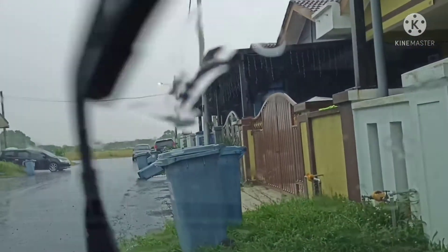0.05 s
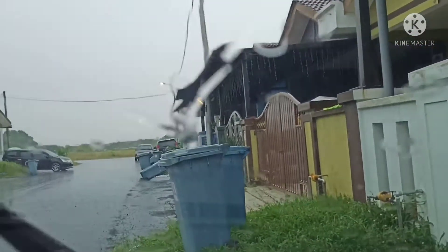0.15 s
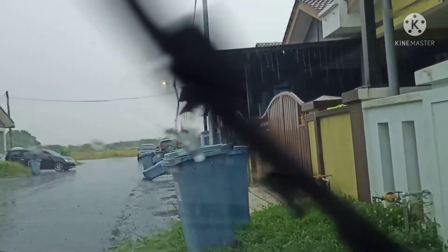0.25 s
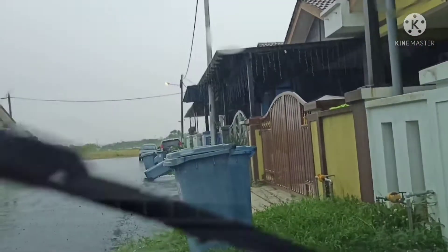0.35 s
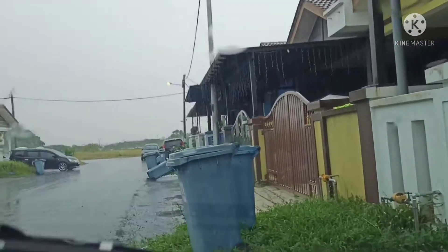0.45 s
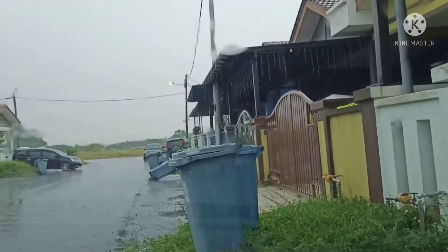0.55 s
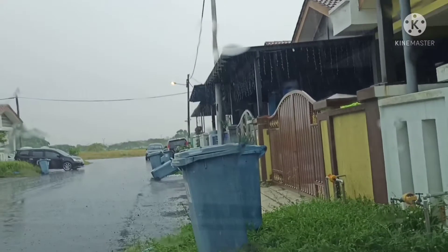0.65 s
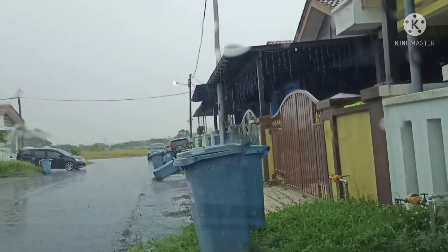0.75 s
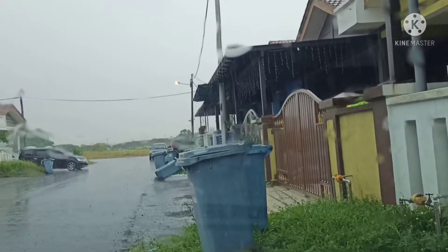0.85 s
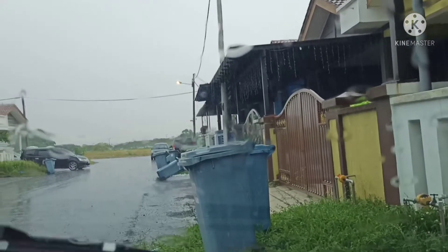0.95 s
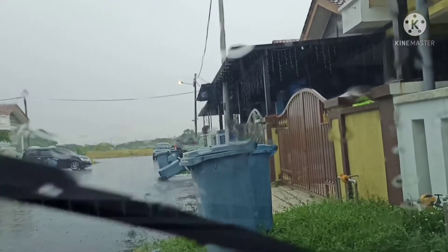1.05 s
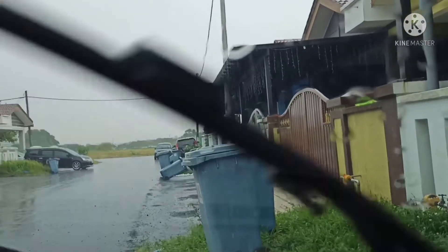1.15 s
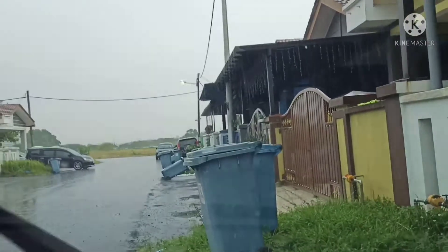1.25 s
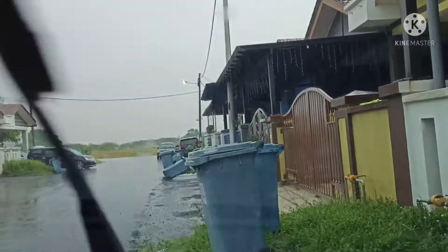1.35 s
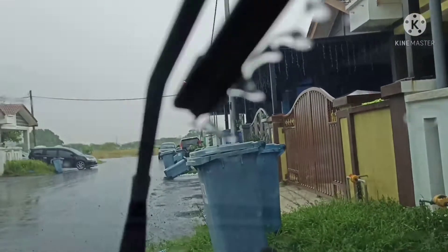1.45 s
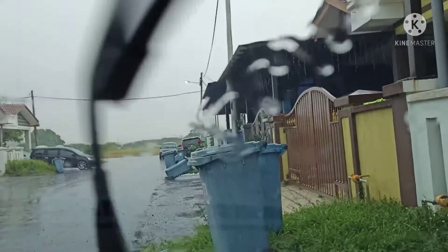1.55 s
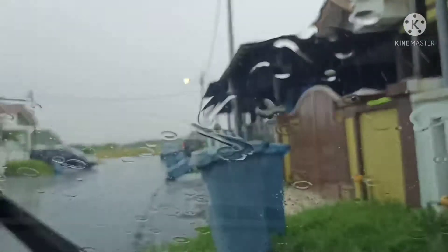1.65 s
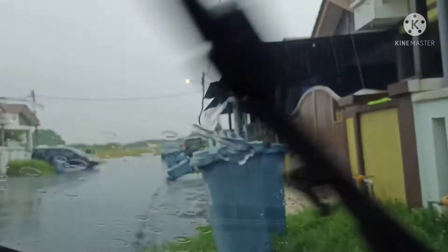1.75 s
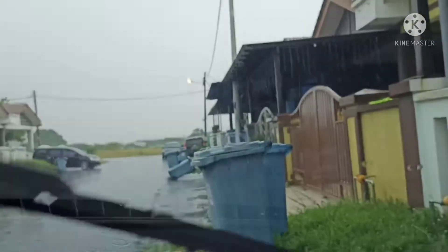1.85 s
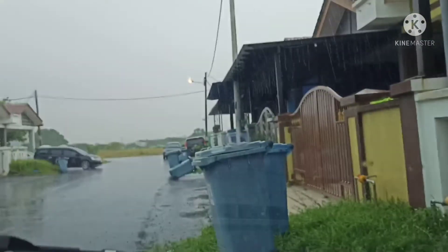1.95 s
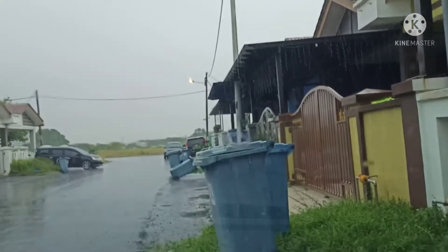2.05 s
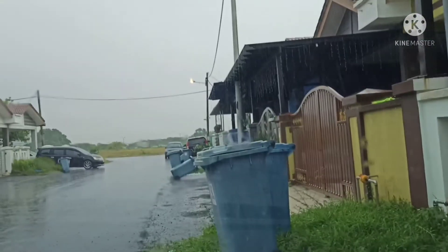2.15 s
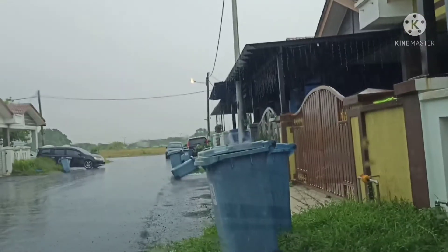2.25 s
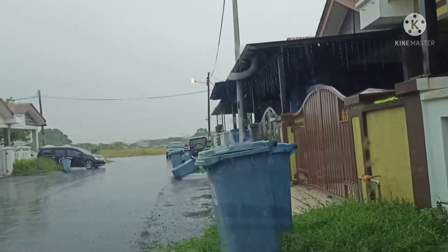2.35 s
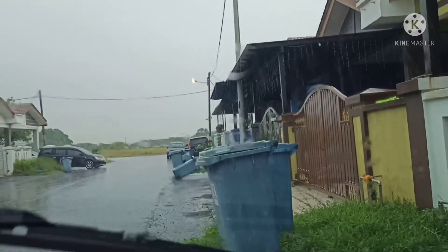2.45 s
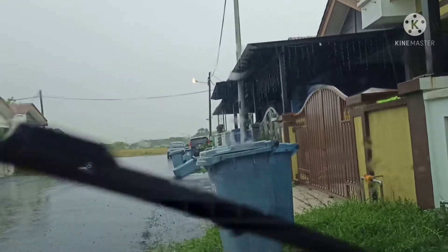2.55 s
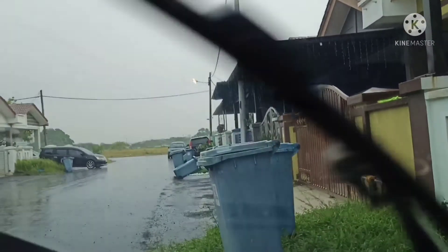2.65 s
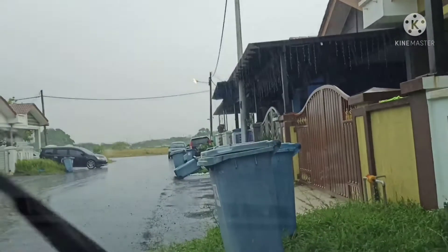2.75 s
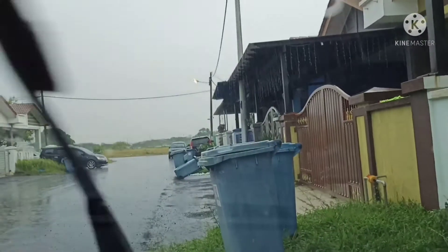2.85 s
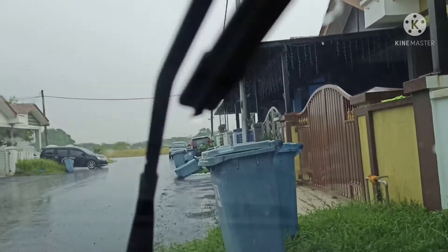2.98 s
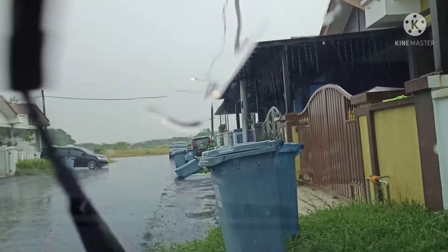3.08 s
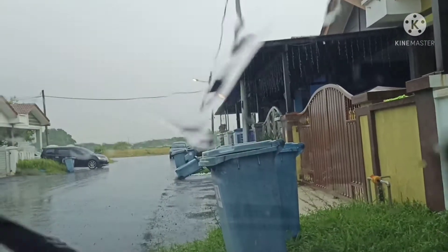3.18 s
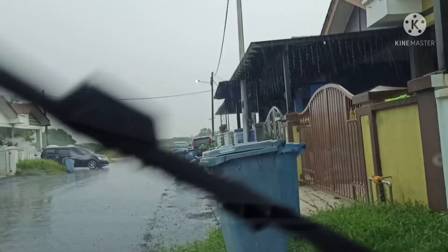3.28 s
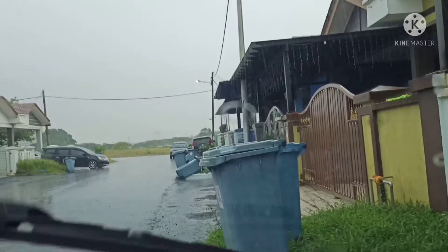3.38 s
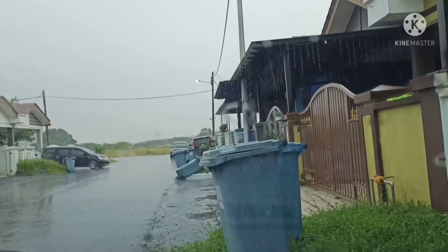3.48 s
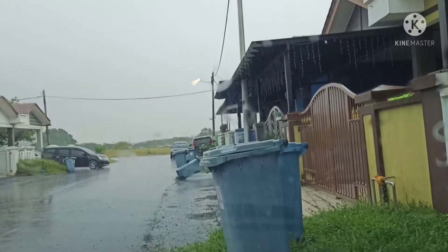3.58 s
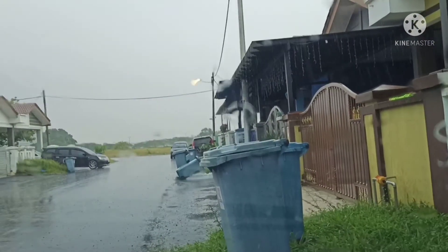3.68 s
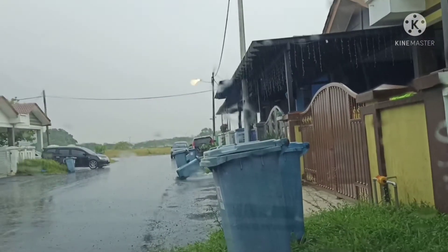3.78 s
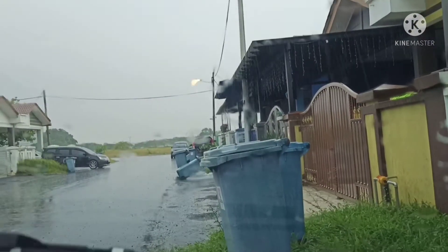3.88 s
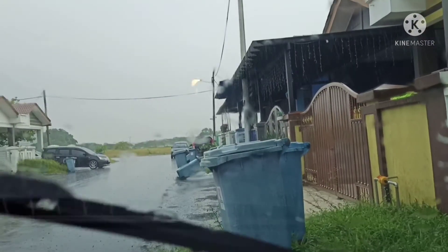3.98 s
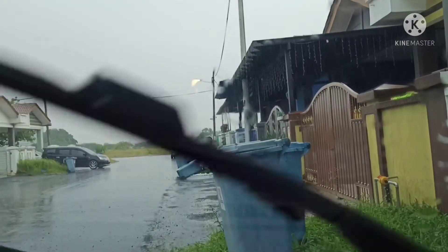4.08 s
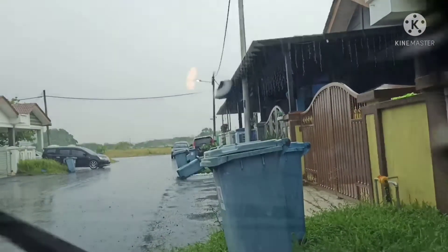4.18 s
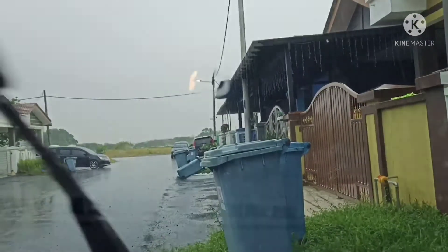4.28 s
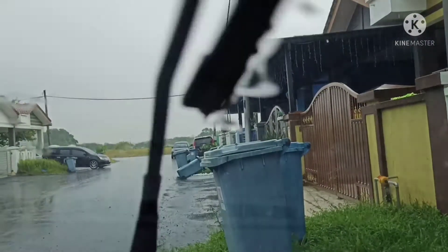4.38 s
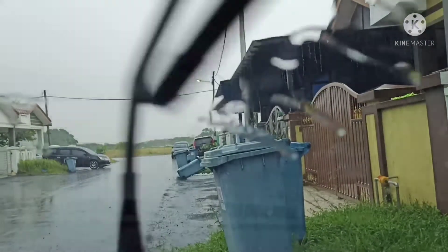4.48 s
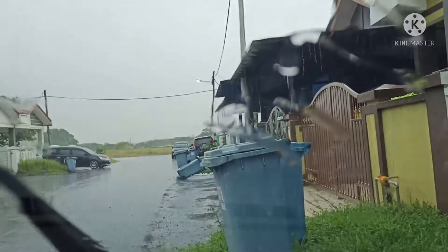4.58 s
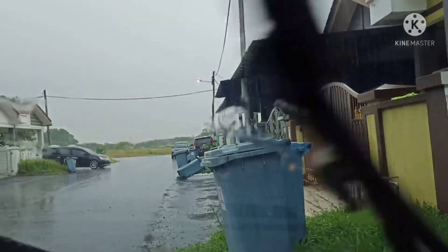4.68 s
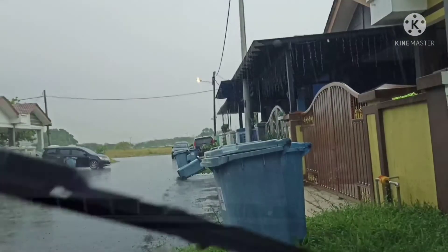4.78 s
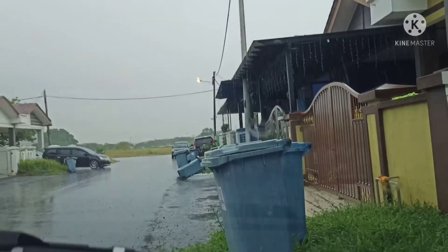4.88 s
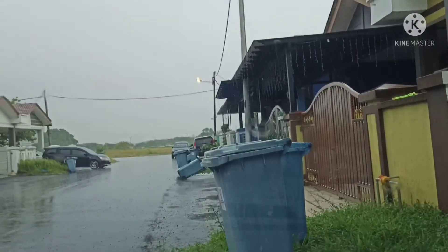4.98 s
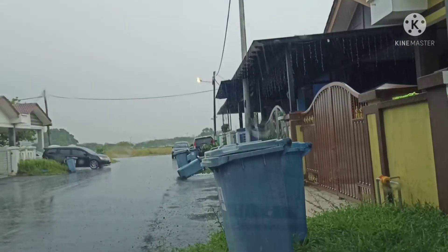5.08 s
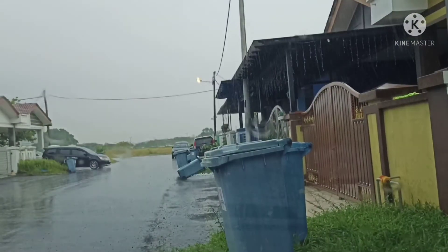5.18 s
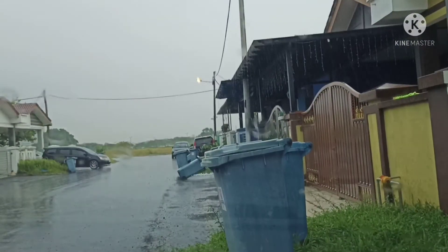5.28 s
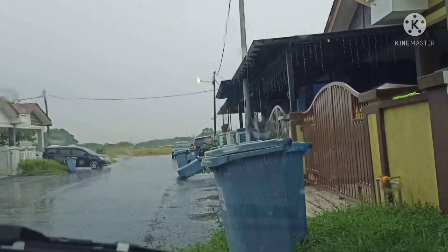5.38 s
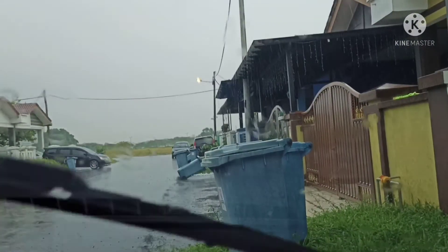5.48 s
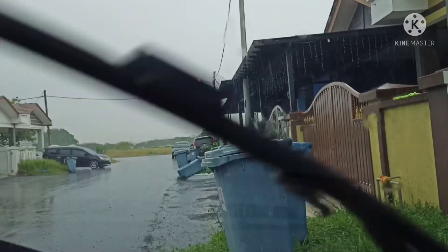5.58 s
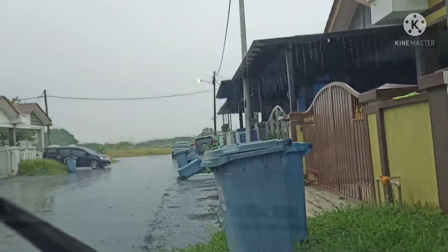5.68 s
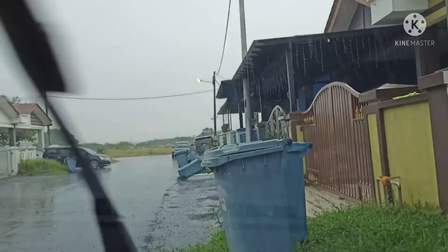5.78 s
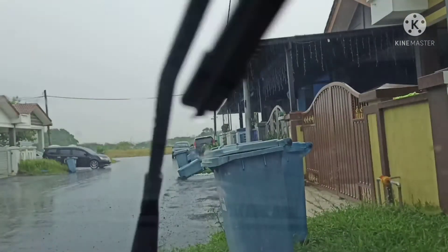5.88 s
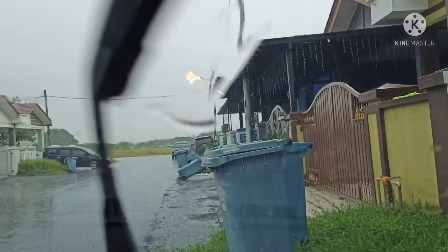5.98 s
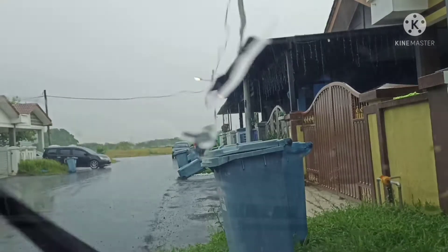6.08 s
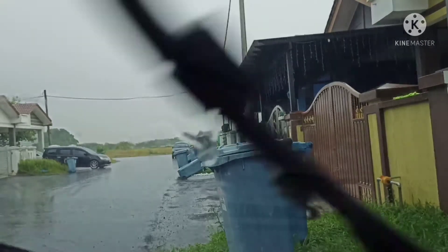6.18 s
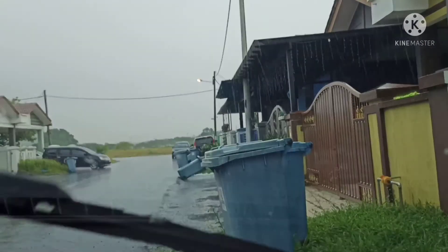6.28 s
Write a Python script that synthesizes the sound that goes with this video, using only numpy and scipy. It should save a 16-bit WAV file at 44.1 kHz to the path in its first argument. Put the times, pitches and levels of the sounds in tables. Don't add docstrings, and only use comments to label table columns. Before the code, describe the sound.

Steady rain drums on a car heard from the cabin, with rhythmic low wiper thuds, rubbery stuttering drags and sharp little droplet taps.

```python
import sys
import numpy as np
from scipy import signal
from scipy.io import wavfile
from scipy.ndimage import uniform_filter1d

SR = 44100
rng = np.random.default_rng(int(sys.argv[2]) if len(sys.argv) > 2 else 0)


def invert_db(x):
    u = np.asarray(x, float) / 20
    return 10 ** u


def wav_out(sig):
    wavfile.write(sys.argv[1], SR, np.round(np.clip(np.atleast_2d(sig).T, -1, 1) * 32767).astype(np.int16))


N = 279153
TIME_S = np.arange(N) / SR

# (time [s], level [dB])
RUMBLE_LEVEL = [(0.0, -35), (0.95, -50), (1.76, -42), (2.0, -50), (2.3, -43), (3.21, -43), (3.9, -57),
                (4.78, -42), (5.01, -52), (6.33, -48)]
# (time [s], level [dB])
RAIN_LEVEL = [(0.0, -45), (0.62, -44.5), (1.5, -46), (3.0, -46), (3.4, -46.5), (3.9, -46), (5.7, -46.2),
              (6.33, -48.5)]
# (frequency [Hz], density [dB per Hz])
GLASS_SPECTRUM = [(470, -20.5), (800, -20.5), (952, 1.5), (1080, -1), (1980, -6), (2380, -8.5), (3250, -6),
                  (3590, -6), (3910, -5), (6590, -14), (7930, -9), (9680, -19), (12600, -25.5),
                  (15500, -18.5)]
# (frequency [Hz], density [dB per Hz])
PANEL_SPECTRUM = [(35, -25), (60, -10.5), (75, -18.5), (86, -9.5), (107, 0), (152, -12.5), (193, -1),
                  (226, -10.5), (300, -6), (376, -12), (407, -16), (592, -12), (900, -20), (1170, -32.5),
                  (1980, -120)]
# (frequency [Hz], density [dB per Hz])
CLOTH_SPECTRUM = [(3530, -37), (6000, -12.5), (7380, -12), (8080, -1), (8780, -8), (9550, -8), (10200, -13),
                  (11200, -8), (13000, -11.5), (14900, -3.5), (15500, -6.5)]
# (start [s], length [s], level at end of press [dB], duller part [dB])
CLOTH_STROKES = [(0.0, 0.17, -50.5, 4), (.36, 0.46, -50.5, 6), (0.981, 0.088, -51, 0), (1.095, .27, -37, 3),
                 (1.8, 0.15, -52, 2), (2.0, 0.14, -55, 3), (2.176, 0.02, -45, 3), (2.22, 0.21, -53.5, 0),
                 (2.617, 0.036, -57.5, -4), (2.72, .24, -44, -2), (3.07, .045, -44.5, 1),
                 (3.163, 0.018, -59, 3)]
# (time [s], level [dB], rib rate [1/s])
SCUFF_PATHS = [
    [(1.892, -64, 760), (1.903, -30.5, 770), (1.915, -33.5, 640), (1.927, -29, 605), (1.945, -35.5, 500),
     (1.962, -35.5, 430), (1.978, -51, 295)],
    [(2.158, -46, 940), (2.166, -32.5, 980), (2.176, -33, 1260), (2.186, -30.5, 1620), (2.192, -32, 1900),
     (2.200, -36, 2000), (2.210, -56, 2080)],
]
# (frequency [Hz], density [dB per Hz])
SCUFF_SPECTRUM = [(240, -34), (653, 3.5), (973, -8), (1470, 0), (2260, -15), (3700, -4.5), (4300, -8),
                  (4900, -3), (6000, -12.5), (7250, -1.5), (9500, -14), (15600, -26)]
# (time [s], peak [dB], low part [dB], high part [dB])
CLEAR_DROPS = [(0.0727, -25, -22, -21), (0.4249, -15, -6.5, -40), (0.5132, -19, -15, -23),
               (0.5664, -17, 1.5, -19), (1.0978, -16, 1.5, -16), (1.4253, -22, 6.5, -26),
               (1.747, -24, -10, -15), (2.0348, -25, -15, -9), (2.4498, -19, 5, -14.5),
               (2.4763, -22, -2, -19), (2.9723, -18, -5, -23.5), (3.3262, -20, 2.5, -24),
               (3.4147, -16, -1, -25), (3.4421, -20, 1, -16), (3.7043, -22.5, 3, -19),
               (3.8311, -19, 1, -18), (3.8822, -18.5, 0, -29), (4.0184, -22, 7.5, -15),
               (4.2015, -19, -15, -26), (4.25, -18.5, -15, -10.5), (4.314, -19, -3, -25),
               (4.3882, -28, 14, -24), (4.784, -23, -5, -23), (4.9901, -20.5, 2.5, -18),
               (5.4001, -19.5, 0, -15), (5.4584, -19, -11, -16), (5.5948, -17.5, -7, -31),
               (5.875, -20, -18, -14), (6.0496, -19, -6, -18), (6.1756, -21, -21, -21)]
# (time [s], level [dB], brightness [dB per decade])
ARM_KNOCKS = [
    (0.9848, -11, 0.5),
    (2.4754, -14.5, -12),
    (3.948, -12, 1),
    (5.4196, -17.5, 0.5),
]
# (frequency [Hz], level [dB], t60 [s])
ARM_MODES = [(291, 2, 0.041), (392, -17.5, 0.095), (1084, -6, 0.012), (3090, -7.5, 0.013),
             (4420, -12.5, 0.018)]
# (time [s], cabin boom [dB], glass [dB], slap [dB], slap lag [s])
BLADE_FLIPS = [
    (.186, -5.5, -16.5, -21, .009),
    (1.677, -17, -13.5, -18, 0.0043),
    (3.157, -5.5, -15.5, -19.5, .010),
    (4.636, -14.5, -15.5, -20, .0041),
    (6.099, -11, -14.5, -24.5, .0058),
]
# (frequency [Hz], rise [s], t60 [s])
FLIP_MODES = [
    (99.7, 0.026, 0.14),
    (171, 0.0088, 0.155),
    (280.6, 0.008, .11),
    (141.3, 0.0087, 0.086),
]
# (frequency [Hz], level [dB], t60 [s])
LIP_MODES = [(392, 5.5, 0.065), (528, -7.5, 0.12), (643, -1, 0.077), (802, 1, 0.04), (1142, -3, 0.035),
             (1340, -11.5, 0.051)]
# (frequency [Hz], density [dB per Hz])
SPRAY_SPECTRUM = [(940, -50), (1600, -9), (3260, -22), (4960, 10), (5500, -10), (7750, 10), (12000, -24),
                  (15500, -8)]
# (level before [dB], resonance before [Hz], level after [dB], resonance after [Hz])
FLIP_DRAG = [
    (-28, 225, -21, 170),
    (-23.5, 177, -23, 130),
    (-28, 130, -21, 175),
    (-28, 120, -22, 130),
    (-28, 125, -26, 100),
]
# (peak time [s], drag [dB], loudest body resonance [Hz], time to lose 10 dB [s])
DOWN_BOUTS = [(.36, -33, 170, .03), (.47, -35, 110, .07), (.6, -33, 104, 0.05), (.71, -32, 150.3, 0),
              (.765, -32, 105, .035), (.91, -29, 130, 0.04), (.964, -26, 110, 0.05),
              (1.925, -28, 125, 0.05), (1.99, -30, 105, .04), (2.04, -30, 190, .04), (2.21, -29, 110, 0.1),
              (2.37, -28, 130.3, .04), (2.43, -25, 150, 0.02), (3.34, -33, 185, 0.08),
              (3.52, -34, 105, 0.12), (3.84, -33, 115, 0.04), (3.893, -22.5, 140, .03),
              (4.99, -36, 106.6, 0.07), (5.15, -33, 115, .04), (5.245, -32, 124.9, 0.05),
              (5.36, -25, 115, 0.06), (6.32, -29, 98, .05)]
# (peak time [s], drag [dB], loudest body resonance [Hz], time to lose 10 dB [s])
UP_BOUTS = [(.045, -34, 237.6, 0), (.108, -37, 231.6, .02), (1.02, -23, 105, 0.05),
            (1.097, -17, 190, 0.0468), (1.164, -15, 159.8, 0.04), (1.235, -20, 164.8, .05),
            (1.44, -29, 137, .06), (1.614, -26, 139.8, 0.06), (2.475, -18, 124.9, .045),
            (2.54, -28, 132.9, 0), (2.7, -32, 130, 0.1), (2.91, -24.5, 119.9, .07), (3.975, -26, 115, .03),
            (4.03, -11, 184, 0.0446), (4.105, -25, 160, 0.02), (4.158, -18.5, 166.1, 0.04),
            (4.24, -29.5, 175, .03), (4.3, -21, 186.2, 0.04), (4.43, -30, 135, 0.09),
            (4.578, -22.5, 109, 0.05), (5.415, -17, 135, .04), (5.48, -27, 125, 0.06),
            (5.565, -28, 260, 0.05), (5.7, -38, 150.3, 0.1), (5.9, -38, 110, 0.12)]
# (time [s], depth [dB])
DRAG_GRIPS = [
    (1.129, 6),
    (2.452, 9),
    (3.92, 8),
    (5.418, 7),
]
# (frequency [Hz], density [dB per Hz])
BODY_SPECTRUM = [(24, -5), (40, -66), (69, -9), (176, -5.5), (240, -5.5), (401, -12), (443, -17.5),
                 (526, -16), (829, -32.5), (1200, -30), (1560, -100), (2640, -120)]


def evened(x):
    return x / np.sqrt(np.mean(x ** 2) + 1e-20)


def steadied(x, size):
    power = uniform_filter1d(uniform_filter1d(x ** 2, size), size)
    return x / np.sqrt(abs(power) + 1e-12)


def read(points, hz):
    f, value = np.transpose(points)
    return np.interp(np.log(hz + 1), np.log(f + 1), value)


def columns(rows, t_s):
    s, *values = np.transpose(rows)
    return [np.interp(t_s, s, v) for v in values]


def add(mix, s, sound):
    part = mix[round(s * SR):][:len(sound)]
    part += sound[:len(part)]


def colour(x, points):
    gain_db = read(points, abs(np.fft.fftfreq(8192, 1 / SR)))
    log_gain = np.log(invert_db(np.maximum(gain_db, -100)))
    taps = np.fft.ifft(np.exp(np.conj(signal.hilbert(log_gain)))).real[:4096]
    return signal.oaconvolve(x, taps / np.linalg.norm(taps))[:len(x)]


def resonate(x, hz, width_hz):
    turn = np.exp(2j * np.pi * np.cumsum(hz) / SR)
    r = np.exp(-np.pi * width_hz / SR)
    return 2 * (turn * signal.lfilter([1 - r], [1, -r], x / turn)).real


def band(x, lo_hz, hi_hz):
    return signal.sosfilt(signal.butter(2, [lo_hz, hi_hz], "bandpass", fs=SR, output="sos"), x)


def splat(length, decay_s):
    return steadied(rng.standard_normal(length), size=24) * np.exp(-np.arange(length) / SR / decay_s) / 2


def rumble():
    roll = band(band(rng.standard_normal(N), 45, 58), 30, 61)
    return invert_db(columns(RUMBLE_LEVEL, TIME_S)[0] - 4.5) * steadied(roll, size=4000)


def rain():
    drops_per_s = 600
    size = invert_db(4.26 * np.minimum(rng.exponential(1, N), 3.0)) * (rng.random(N) < drops_per_s / SR)
    t_s = np.arange(1500) / SR
    pulse = np.exp(-t_s / 0.0014) + 0.15 * np.exp(-t_s / 0.015)
    power = signal.oaconvolve(size ** 2, pulse ** 2)[:N]
    patter = evened(np.sqrt(abs(power)) * rng.standard_normal(N))
    gusts = evened(band(rng.standard_normal(N), 2.4, 18.5))
    patter = patter * invert_db(1.52 * gusts)

    z = signal.stft(rng.standard_normal(N), SR, nperseg=512)[2]
    patches = evened(uniform_filter1d(uniform_filter1d(rng.standard_normal(z.shape), 9, 0), 7, 1))
    wash = evened(signal.istft(z * invert_db(1.68 * patches), SR, nperseg=512)[1][:N])

    glass = evened(colour(invert_db(1.5) * patter + wash, GLASS_SPECTRUM))
    panels = evened(colour(invert_db(-10.0) * patter + wash, PANEL_SPECTRUM))
    return invert_db(columns(RAIN_LEVEL, TIME_S)[0]) * (invert_db(3.5) * glass + invert_db(10.0) * panels)


def brush():
    touch_s, press_db, lift_db_per_s = 0.035, 5, 300
    grain = invert_db(11.0 * uniform_filter1d(rng.standard_normal(N), size=90))
    hiss = evened(colour(grain * rng.standard_normal(N), CLOTH_SPECTRUM))
    dull = evened(band(grain * rng.standard_normal(N), 5200, 8600))
    out = np.zeros(N)
    for s, length_s, db, dull_db in CLOTH_STROKES:
        along = np.clip((TIME_S - s) / length_s, 0, 1)
        touch = np.clip((TIME_S - s) / touch_s + 1, 0, 1) ** 2
        press = invert_db(db - press_db * (1 - along))
        lift = invert_db(-lift_db_per_s * np.maximum(TIME_S - s - length_s, 0))
        out += touch * press * lift * (invert_db(5.0) * hiss + invert_db(dull_db - 6.5) * along ** 2 * dull)
    return out


def scuffs():
    out = np.zeros(N)
    for rows in SCUFF_PATHS:
        t_s = np.arange(rows[0][0], rows[-1][0], 1 / SR)
        level_db, ribs_hz = columns(rows, t_s)
        jitter = 0.3 * uniform_filter1d(rng.standard_normal(len(t_s)), size=90)
        turns = np.cumsum(ribs_hz * (1 + jitter)) / SR
        ticks = np.zeros(len(t_s))
        for k in range(1, 30):
            ticks += np.cos(2 * np.pi * (k * turns + rng.random())) * (k * ribs_hz < 15000)
        rub = colour(steadied(ticks, size=200) + 0.6 * rng.standard_normal(len(t_s)), SCUFF_SPECTRUM)
        add(out, t_s[0], invert_db(level_db) * evened(rub))
    return out


def drops():
    out = np.zeros(N)
    flung = [(s + lag_s, slap_db + 5.3, 4.5, -15.5) for s, _, _, slap_db, lag_s in BLADE_FLIPS]
    flung += [(s, db - 9, 5.7, -27) for s, db, _ in ARM_KNOCKS]
    for s, peak_db, low_db, high_db in flung + CLEAR_DROPS:
        tick = 2.77 * band(splat(900, 0.0012), 2000, 7000)
        tap = 3.4 * invert_db(low_db) * band(splat(900, 0.0097), 300, 1180)
        fizz = 4.3 * invert_db(high_db) * band(splat(900, 0.0023), 6800, 13700)
        add(out, s, invert_db(peak_db - 9.0) * (tick + tap + fizz))
    return out


def knocks():
    out, t_s = np.zeros(N), np.arange(SR // 8) / SR
    for s, db, bright_db in ARM_KNOCKS:
        for hz, mode_db, t60_s in ARM_MODES:
            ring = invert_db(db + mode_db + bright_db * np.log10(hz / 300) - 60 * t_s / t60_s)
            add(out, s, -ring * (1 - np.exp(-t_s / 0.0022)) * np.sin(2 * np.pi * hz * t_s))
        crack = band(splat(900, 0.0027), 1300, 3900)
        add(out, s, invert_db(db + bright_db - 4.5) * crack)
    return out


def flips():
    stiffen_hz_per_db = 0.5
    out, t_s = np.zeros(N), np.arange(SR // 3) / SR
    for s, boom_db, glass_db, slap_db, lag_s in BLADE_FLIPS:
        frame_db, push_db = -19 + 0.41 * boom_db, -5 + 0.88 * boom_db
        levels_db = boom_db, glass_db, frame_db, push_db
        shifts_hz = 0, stiffen_hz_per_db * (boom_db + 15.5), 0, 0
        for (hz, rise_s, t60_s), db, shift_hz in zip(FLIP_MODES, levels_db, shifts_hz):
            swell = (1 - np.exp(-t_s / rise_s)) ** 2 * invert_db(db + 18.5 - 60 * t_s / t60_s)
            add(out, s, swell * np.sin(2 * np.pi * (hz + shift_hz) * t_s))
        lip = sum(invert_db(db - 60 * t_s / t60_s) * np.sin(2 * np.pi * hz * t_s) for hz, db, t60_s in LIP_MODES)
        spray = colour(rng.standard_normal(len(t_s)) * np.exp(-t_s / 0.0035), SPRAY_SPECTRUM)
        onset = 1 - np.exp(-t_s / 0.0011)
        add(out, s + lag_s, invert_db(slap_db) * onset * (lip + invert_db(-12.0) * spray))
    return out


def drag():
    before_s, before_width_s, after_s, after_width_s = 0.012, 0.025, 0.078, 0.04
    glide_db, glide_hz = -46, 107.9
    flatness = 1.6
    bouts = DOWN_BOUTS + UP_BOUTS
    for (s, *_), (before_db, before_hz, after_db, after_hz) in zip(BLADE_FLIPS, FLIP_DRAG):
        bouts.append((s - before_s, before_db, before_hz, before_width_s))
        bouts.append((s + after_s, after_db, after_hz, after_width_s))
    t_s = TIME_S[::64]
    s, db, hz, width_s = np.transpose(bouts)[:, :, None]
    power = invert_db(db - 10 * (abs(t_s - s) / width_s) ** flatness) ** 2
    glide_power = invert_db(glide_db) ** 2
    total = power.sum(0) + glide_power
    body_hz = ((power * hz).sum(0) + glide_power * glide_hz) / total
    return np.interp(TIME_S, t_s, 10 * np.log10(total)), np.interp(TIME_S, t_s, body_hz)


def blades():
    drag_db, body_hz = drag()
    slips_hz = body_hz / 2
    rattle_db = -10 - 0.15 * (drag_db + 29.5)
    drag_db = drag_db - sum(db * np.exp(-((TIME_S - s) / 0.0061) ** 2) for s, db in DRAG_GRIPS)

    regular = np.clip(0.45 + 0.022 * (drag_db + 21.5), 0.1, 0.9)
    jitter = 0.403 * uniform_filter1d(rng.standard_normal(N), size=600)
    turns = np.cumsum(slips_hz * (1 + jitter)) / SR
    pulses = sum(np.cos(2 * np.pi * k * turns) for k in range(1, 14))
    scrape = band(rng.standard_normal(N), 27, 850)
    drive = colour(regular * evened(pulses) + (1 - regular) * evened(scrape), BODY_SPECTRUM)

    rung = 0.36 * band(drive, 75, 225) + resonate(drive, body_hz, 31.0)
    trim = resonate(scrape, np.full(N, 350), width_hz=90)
    rattle = evened(band(drive, 270.1, 780)) + invert_db(-1.5) * evened(trim)
    rattle = steadied(rattle, size=900)
    return invert_db(drag_db + 1.2) * (steadied(rung, size=700) + invert_db(rattle_db - 1.5) * rattle)


def scene():
    background = rain() + rumble() + brush() + scuffs()
    return (background + drops() + knocks() + flips() + blades())[None]


def top_cut(x):
    return signal.sosfilt(signal.butter(12, 16850, fs=SR, output="sos"), x)


def record(dry):
    soft = dry / (1 + abs(dry / 0.95) ** 4) ** 0.25
    edge = signal.firwin(601, 15560, window=("kaiser", 9), fs=SR)
    mix = signal.oaconvolve(soft, edge[None], "same")
    return top_cut(mix)


dry = scene()
out = record(dry)
wav_out(out)
```